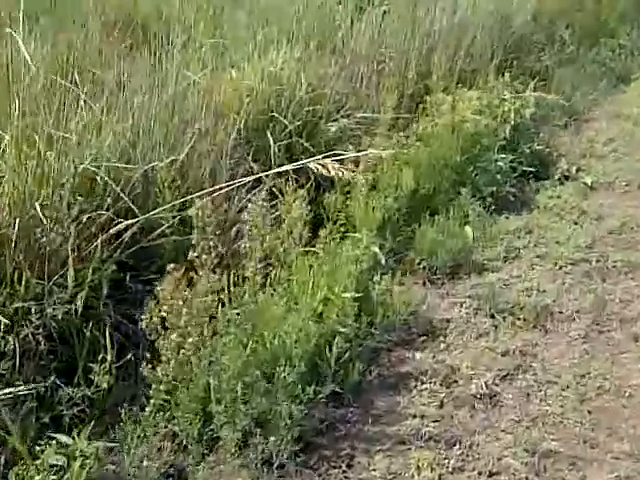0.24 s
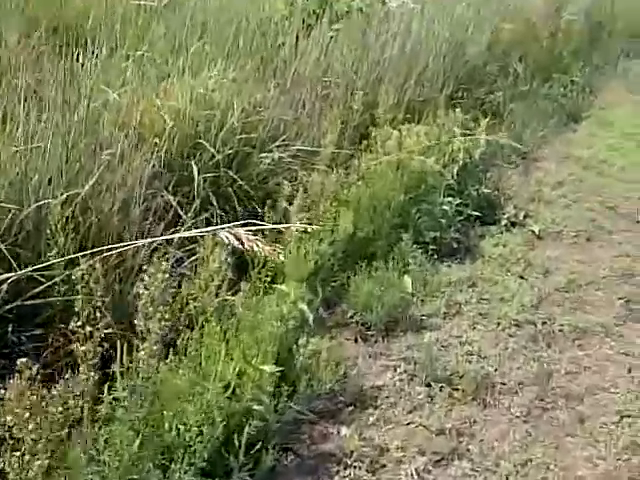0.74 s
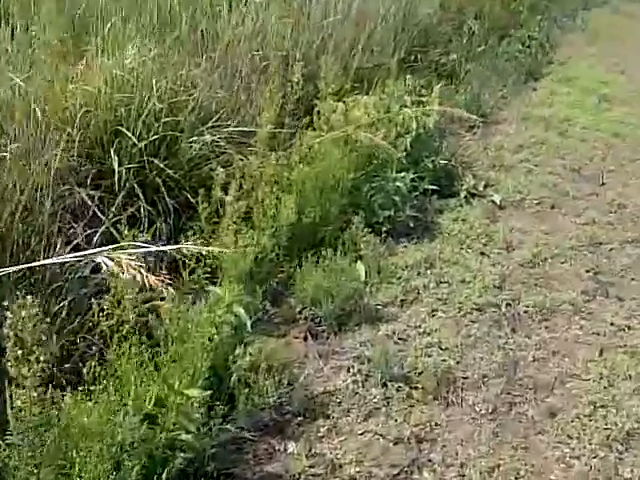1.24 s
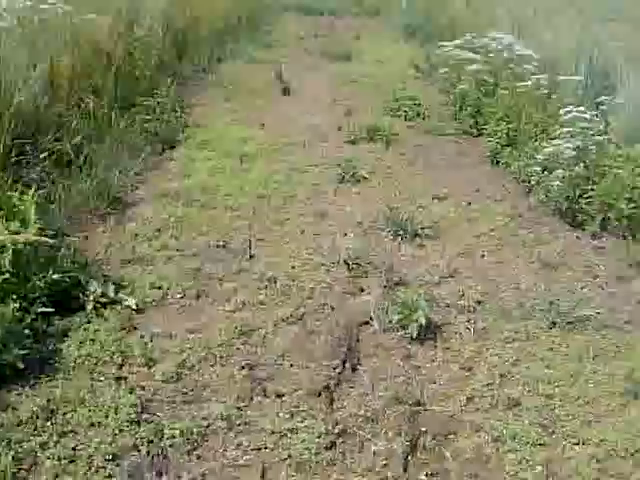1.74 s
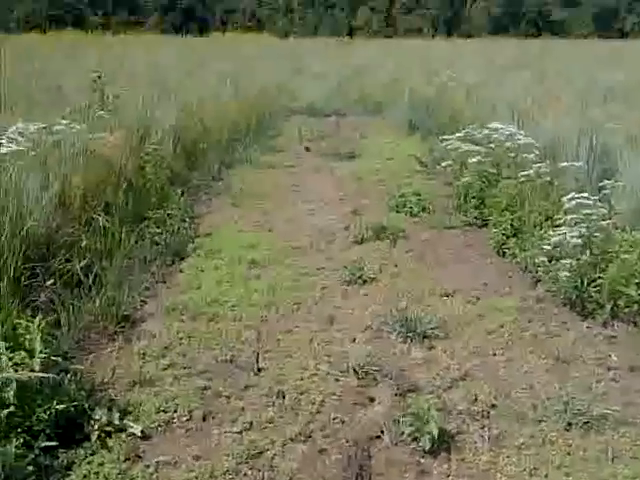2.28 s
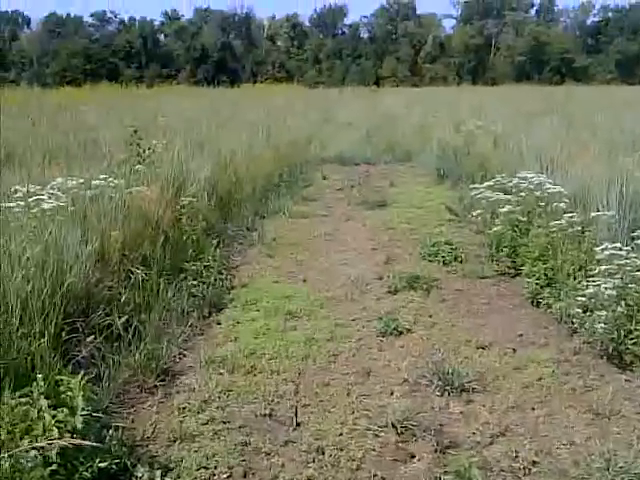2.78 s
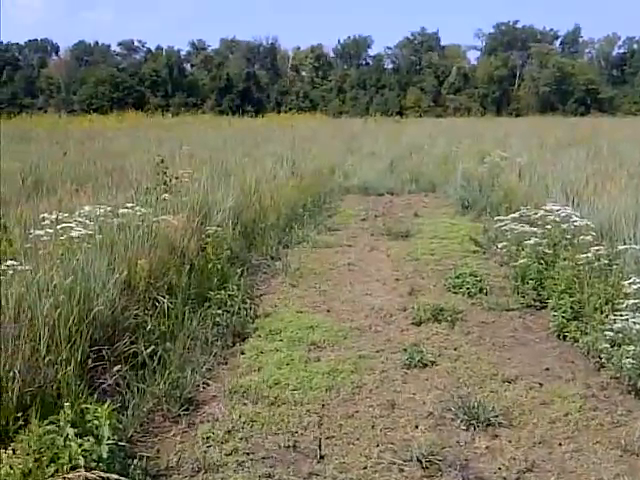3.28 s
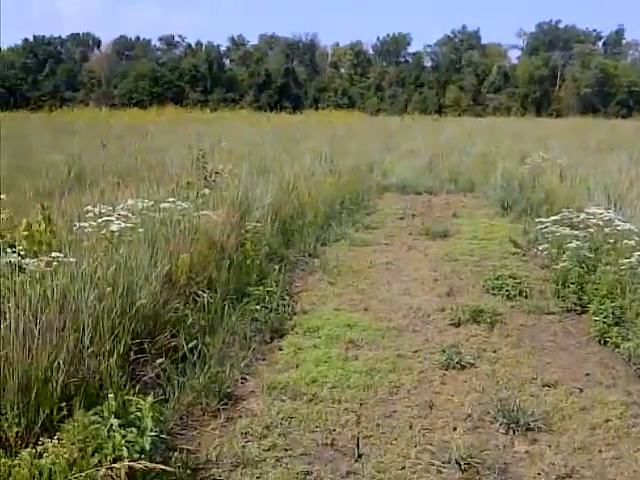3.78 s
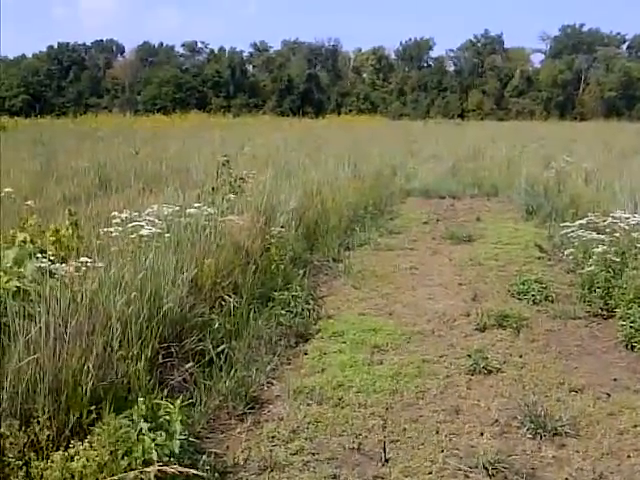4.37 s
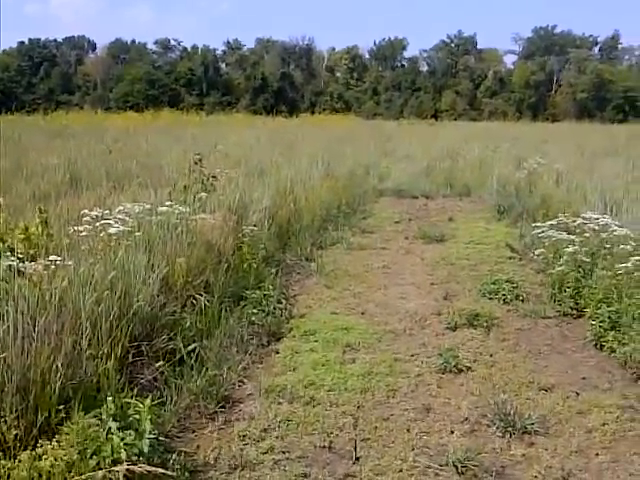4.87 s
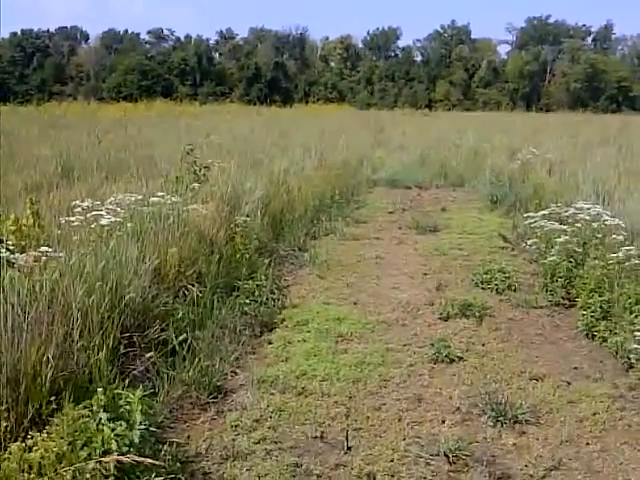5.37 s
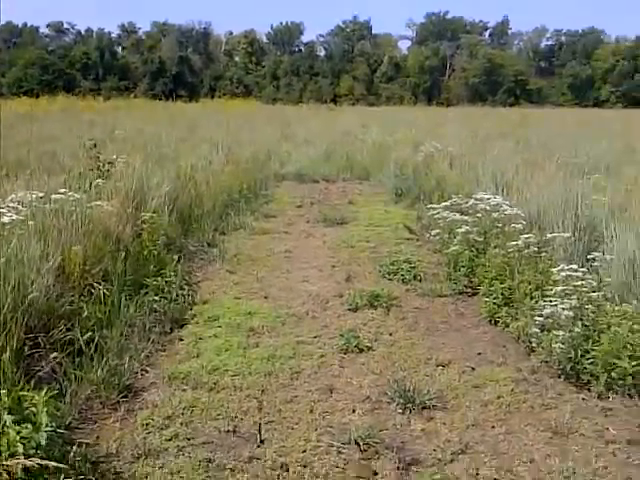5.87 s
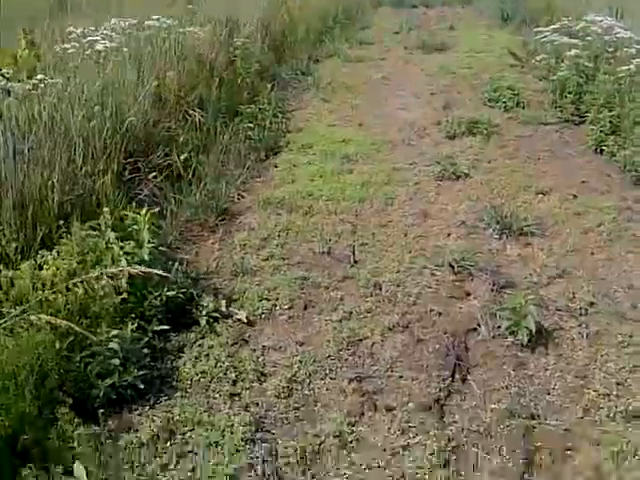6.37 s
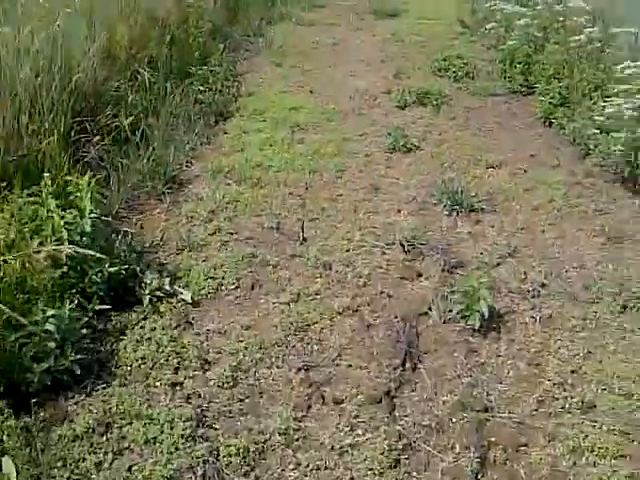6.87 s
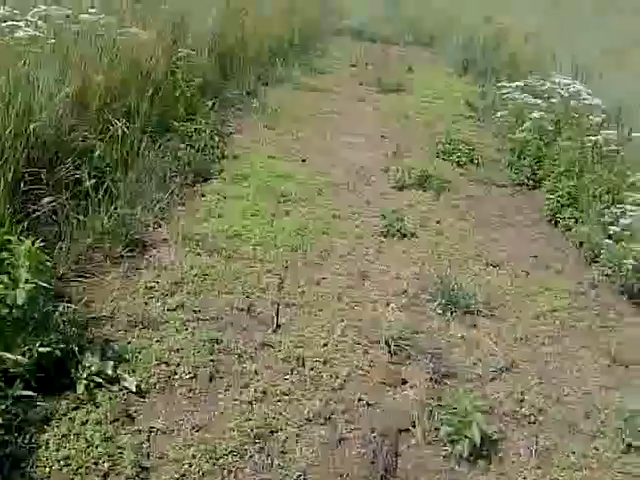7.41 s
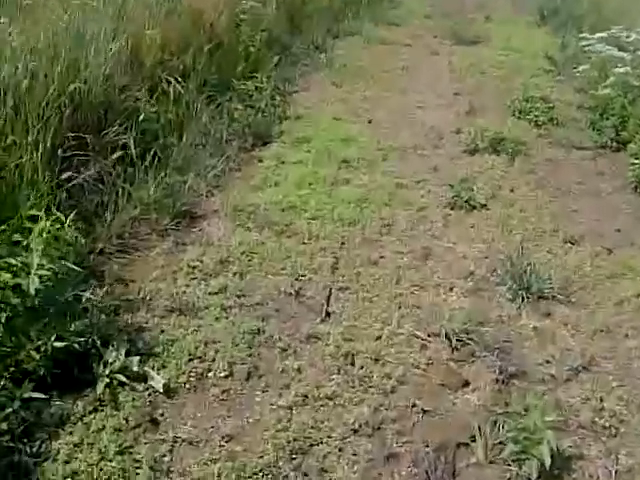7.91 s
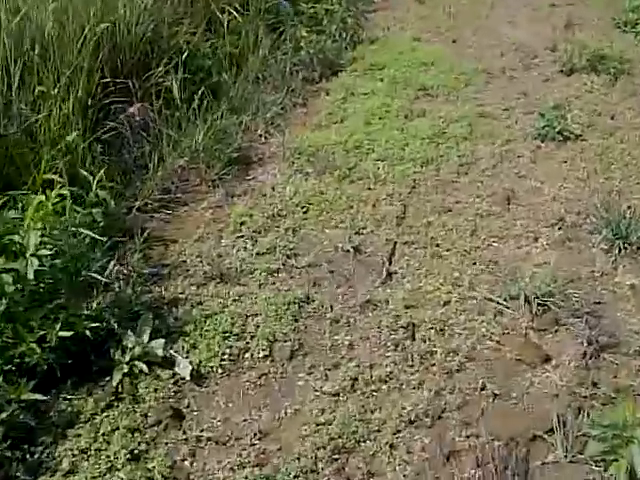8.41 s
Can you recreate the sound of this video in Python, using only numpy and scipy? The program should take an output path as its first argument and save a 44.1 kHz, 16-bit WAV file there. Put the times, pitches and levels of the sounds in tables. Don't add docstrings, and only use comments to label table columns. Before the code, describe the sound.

Outdoors in tall grass, handling thumps and stem snaps precede small far dog yelps, two barks, then louder hoarse bays ending in a howl.

```python
import sys
import numpy as np
from scipy import signal
from scipy.fft import rfft, irfft
from scipy.io import wavfile
from scipy.ndimage import uniform_filter1d

SR = 44100
rng = np.random.default_rng(int(sys.argv[2]) if len(sys.argv) > 2 else 0)


def invert_db(x):
    u = np.asarray(x, float) / 20
    return 10 ** u


def wav_record(signal):
    frames = np.transpose(np.atleast_2d(signal))
    bounded = np.clip(frames, -1, 1)
    quanta = np.round(bounded * 32767).astype(np.int16)
    wavfile.write(sys.argv[1], SR, quanta)


N = 381465
T = np.arange(N) / SR

# (time [s], length [s], start pitch [Hz], top pitch [Hz], level [dB])
YELPS = [
    (2.83, 0.039, 640, 786, -56.5),
    (3.305, 0.028, 743.5, 898.2, -38),
    (3.753, 0.017, 668.5, 686, -60.5),
    (3.917, 0.037, 501.6, 605.6, -53),
    (4.012, 0.033, 1133, 1305, -65),
    (6.989, 0.036, 676, 839, -52.5),
]
# (time [s], length [s], start pitch [Hz], top pitch [Hz], level [dB])
OPENINGS = [
    (5.073, 0.027, 900.2, 1050, -23.5),
    (5.557, 0.024, 967.3, 902, -23.5),
]
# (time [s], fold pitch [Hz], effort [dB], odd over even partials [dB], mouth opening [dB])
FAR_YELP = [(3.04, 760, -69, 30, -5), (3.076, 1260, -53.5, 30, -3), (3.098, 1273, -39.5, 30, -7),
            (3.116, 1243, -45, 30, -5), (3.13, 1250, -90, 30, -2)]
WHIMPER = [(4.063, 660, -65, 24, -8), (4.085, 1015, -53.5, 18, -6), (4.099, 1045, -43.5, 15, 1),
           (4.116, 1065, -73, 24, -3)]
YIP = [(4.427, 920, -63, 33, -26), (4.434, 930, -33, 16, -50), (4.45, 968, -30.5, 13, -47),
       (4.472, 1216, -70, 34, -34)]
WHINE = [(4.658, 672, -72, -42, -14), (4.666, 699, -28.5, -54, -30.5), (4.696, 767, -35.5, -38, -2.5),
         (4.766, 706, -24.5, -59.5, -19.5), (4.793, 683.2, -26, -35, -12.5), (4.853, 644, -35, -38.5, -5.5),
         (4.894, 742, -31, -42, -30.5), (4.906, 697, -41.5, -20, -30), (4.928, 391, -82.5, -15, -28)]
BARK = [(5.104, 690, -26.5, -41.5, -13), (5.122, 733, -18.5, -43, -20.5), (5.164, 723, -18, -36.5, -27.5),
        (5.196, 676, -23, -45.5, -9), (5.208, 710, -25.5, -46, -11.5), (5.218, 703, -29, -46, -13),
        (5.228, 598, -66, -18.5, -19)]
BROKEN_BARK = [(5.583, 633, -30.5, -1.5, -46), (5.593, 725, -23.5, -28.5, -21),
               (5.611, 745, -23.5, -64, -19), (5.666, 709, -20, 0, -27.5), (5.694, 630, -32.5, -10, -13.5),
               (5.716, 640, -37.5, -49, -25), (5.741, 678, -71, -6.5, -7)]
BAY_START = [(7.135, 756.6, -55.5, 18, -5), (7.146, 766.6, -38.5, 15.5, -19), (7.16, 804.3, -32, 6.7, -8.5),
             (7.166, 865.6, -29.5, 5.4, -14)]
BAY = [(7.172, 641.3, -27.5, -0.5, -20), (7.19, 694.8, -31, -11, -4.5), (7.22, 695, -26.5, -3.5, -1.5),
       (7.238, 668.7, -21, -12, -12.5), (7.261, 667, -16, -19, -13), (7.279, 649.3, -17, -14, -18),
       (7.301, 647, -19.5, -16, -11), (7.342, 642, -31, -45.5, -12)]
BAY_TAIL = [(7.363, 603.2, -56, -25, 12), (7.388, 601.3, -49, -14, 12.5), (7.409, 687.7, -43.5, -29.5, -22),
            (7.427, 687.8, -80.5, -9, -2)]
SHORT_START = [(7.655, 719.3, -59, 12.5, -23), (7.659, 696.4, -27.5, 9.9, -11.5),
               (7.671, 753, -26.5, 28, 0), (7.685, 830, -15, 24, -14), (7.694, 757, -23, 18, 6.5)]
SHORT_BAY = [(7.698, 671.4, -29, -9.5, 6.5), (7.723, 717.4, -25.5, -15, -8.5),
             (7.735, 724.2, -29.5, 21, -2), (7.75, 710, -21.5, 9, -30.5), (7.763, 700.3, -31.5, -1, 6),
             (7.786, 678.8, -17, 9.5, -9.5), (7.8, 628.8, -22.5, 5.5, -4.5)]
SHORT_TAIL = [(7.829, 656.6, -36.5, -30, -14), (7.85, 636.3, -30.5, -35, -17),
              (7.873, 630.4, -41, -22, -29), (7.888, 600, -74, -10, -24)]
GROWL_START = [(8.153, 665, -52, 23, -5), (8.157, 648.6, -28, 21.6, 0), (8.172, 718.4, -17.5, 42, -2),
               (8.179, 684, -23, 13, 1.5)]
GROWL = [(8.185, 614, -24.5, 8.5, 1), (8.203, 652, -33.5, -13, 7), (8.227, 631, -20.5, 13.5, 4.5),
         (8.244, 641, -27.5, 6, 12), (8.257, 660, -16.5, 25.5, 17), (8.285, 583, -19.5, 8.5, -9),
         (8.31, 578, -18.5, 12, -24.5), (8.322, 566.3, -22, 13, -12.5), (8.337, 583, -17.5, 6.5, -11.5)]
HOWL = [(8.374, 602.8, -16, 2, -23), (8.424, 616.4, -14, 7, -15.5), (8.443, 623, -15, 11.5, -6.5),
        (8.505, 590.5, -20, -5, -31), (8.538, 586.5, -19.5, -4.5, -19.5), (8.567, 610, -16, 6.5, -16),
        (8.593, 562, -25.5, 4.5, -23.5), (8.615, 639, -30.5, -59, -9.5), (8.649, 516, -69, -17.5, -22.5)]
# (start [s], end [s], irregularity [0-1])
HOARSE = [(5.098, 5.106, .08), (5.577, 5.59, .4), (7.146, 7.174, .6), (7.174, 7.21, .2), (7.21, 7.275, .3),
          (7.662, 7.702, .45), (7.702, 7.82, .14), (8.158, 8.186, .55), (8.186, 8.222, .13),
          (8.222, 8.25, .5), (8.25, 8.272, .4), (8.272, 8.326, .6), (8.326, 8.354, .4), (8.354, 8.575, .06),
          (8.575, 8.595, .22)]
LEAK_DB = [-4, 8, 6.5, 7.5, -4.5, 1.5, -10.5, -1.5, -0.5, 8, 4, 6.5, 3, -15.5, -3.5]
# (upper part [dB], sizzle [dB], growl under the voice [dB])
RASP_COLOUR = [(5, 3, -9), (-3, -0.5, -9.5), (-5.5, -2, 13), (0.5, 3.5, 2), (10, 9.5, -2), (7, -3, 2),
               (-1.5, -1, -4), (-1.5, -11, 15), (-7, 0, 1), (2.5, 1.5, -9), (-1, 9.5, -3.5), (-2, -6, -2),
               (-0.5, -3.5, 0.5), (1.5, 0, -2.5), (2, -4, -4)]
RASP_MIDDLE_DB = [2.5, 6.5, 8, -1, 0.5, -9.5, 3, 7, -0.5, 7.5, 2, -2.5, -1, -2, 5]
# (frequency [Hz], level [dB])
THROAT = [(3000, 2.5), (3300, -15), (3700, -39.5), (4300, -22.5), (4800, -33), (5600, -29), (7500, -39)]
# (time [s], lift of fifth partial [dB], of sixth [dB], of those above [dB])
UPPER = [(4.69, 1.5, -1.5, -4), (4.79, 0, -9.5, 6), (4.83, 0, -15, -11.5), (5.12, 3.5, 7, 0),
         (5.2, -2, -6, -2.5), (5.6, 4.5, -8.5, 7), (5.64, 14.5, 3.5, 21), (5.69, 10, -9.5, -10),
         (7.19, 16, -7.5, -9.5), (7.24, 18, -17, -6), (7.28, 6.5, 6, -3), (7.7, -9.5, -2.5, -11),
         (7.8, 9.5, -8, -3), (8.2, -3.5, -5, -6), (8.3, -4, -7, -2), (8.38, 4, 6.5, 6), (8.6, -6, 1, 3.5)]
# (time [s], peak level [dB], relative knock [dB], relative treble [dB])
SNAPS = [(1.5952, -37, -6, -43), (1.6399, -30, -14, -63), (1.6696, -57, 12, -13), (1.7845, -50.5, -3, -17),
         (2.315, -62.5, 15, -16), (5.995, -18.5, -13, -35.5), (6.318, -23, -18.5, -5),
         (6.427, -28.5, -12, -35), (6.559, -28, -14.5, -11), (6.576, -48, 16, -27), (6.71, -59.5, 19, -15),
         (6.7751, -54.5, 15, -9), (6.8478, -46.5, 11.5, -17), (6.875, -53, 10, -10), (6.9, -25, -17.5, 2),
         (6.9202, -25.5, -7, 8.5), (6.9862, -56, 13.5, -11), (7.1223, -48, -24, -8.5),
         (7.259, -44, -18.5, 5.5), (7.3, -42, 17, -14), (7.482, -26.5, -16.5, -33), (8.11, -48, -5, -2),
         (8.137, -58, 9, -9.5), (1.447, -58, 7, -9), (1.548, -50.5, 0.5, -11), (2.298, -61, 6, -13),
         (6.298, -47, -6, -9), (6.39, -55, 3, -8), (8.1553, -43.5, 5, -15)]
# (frequency [Hz], width [Hz], level [dB])
CRACK = [(1590, 680, 43.5), (2760, 99, 34)]
# (time [s], peak level [dB], pitch [Hz], length [cycles])
BUMPS = [(0.454, -38, 99, 1.4), (0.497, -38, 107, 3.4), (0.537, -37.5, 130, 1.1), (0.854, -38, 129, 0.86),
         (0.877, -26, 153, 0.85), (0.926, -36, 120, 0.63), (0.974, -28.5, 109, 0.72),
         (1.002, -41, 140, 0.81), (1.021, -26.5, 113, 2.4), (1.82, -29.5, 108, 2.1),
         (1.903, -32, 116, 0.93), (4.132, -49, 190, 12.3), (4.179, -50.5, 186, 8.4),
         (5.995, -31.5, 185, 2.8), (6.844, -32, 175, 1.4), (7.197, -25.5, 128.4, 0.47),
         (7.2988, -23.5, 248.8, 1.63)]
# (time of peak [s], rise [s], fall [s], level [dB], relative dry part [dB])
RUSTLE = [(1.4, 1.7, 0.43, -70, -28.5), (1.599, 0.055, 0.091, -55.5, -28), (1.7, .05, .12, -59.5, -24.5),
          (1.945, 0.079, 0.064, -56, -14), (2.21, 0.047, 0.039, -58, -37), (6.001, 0.0066, 0.052, -54, -12),
          (6.32, 0.19, 0.011, -62, -6), (6.358, 0.022, 0.73, -71, -35.5), (6.715, 0.013, 0.36, -61.5, 1),
          (6.764, 0.2, 0.015, -66.5, -4), (6.851, 0.0058, 0.11, -52.5, 6.5), (7.021, 0.059, 0.053, -58, -2),
          (7.15, 0.034, 0.2, -57, -3.5), (7.221, 0.12, 0.13, -61.5, 2), (7.4, 0.33, 0.55, -65.5, -32),
          (7.529, 0.19, 0.27, -71.5, -23), (6.62, 0.093, 0.23, -63.5, -22),
          (7.95, 0.98, 0.82, -60.5, -32.5)]
# (frequency [Hz], width [Hz], level [dB])
DRY_LEAVES = [(3550, 3800, 14), (5800, 2300, -15)]
# (time [s], firing rate [Hz])
ENGINE = [(0, 21), (.6, 20.8), (1.08, 23.7), (1.35, 25.8), (1.71, 26.7), (2.28, 26.3), (2.51, 21.7),
          (2.86, 18.7), (3.1, 19.2), (3.45, 17.7), (3.8, 16.4), (4.3, 16.4), (4.94, 18.6), (5.3, 22.3),
          (6.0, 28.2), (6.36, 27.4), (7.23, 26.4), (8.2, 28.3)]
# (level [dB], exhaust resonance [Hz])
EXHAUST = [(-56, 114.5), (-48, 100), (-47, 113), (-46.5, 119.6), (-46.5, 149), (-47.5, 129), (-48.5, 69),
           (-54.5, 99), (-57.5, 104.5), (-64.5, 78), (-81, 80), (-63, 97), (-50, 110), (-49, 120),
           (-47.5, 123), (-48, 118.8), (-50, 132), (-48, 121)]
# (frequency [Hz], density [dB per Hz])
FIELD = [(25, -22.5), (65, 5.5), (100, 4.5), (180, -3), (400, -14.5), (1300, -17.5), (2200, -23.5),
         (3900, -29.5), (4700, -25.5), (5400, -32), (7500, -33.5)]
# (time [s], level [dB])
BREEZE = [(0, -2.5), (.5, 0), (1.5, -1), (2.1, 0.5), (2.6, -1.5), (3.2, 0), (3.75, -2.5), (4.3, -0.5),
          (5.3, 0.5), (6.5, 2), (8.65, 2)]
# (frequency [Hz], level [dB])
TREBLE_FLOOR = [(3000, -88), (4500, -82), (5300, -75), (7500, -67)]
# (start [s], end [s], lost above [Hz])
TREBLE_LOSS = [
    (.84, .895, 2800),
    (.97, 1.03, 2300),
    (1.605, 1.635, 5300),
    (1.735, 1.79, 6000),
    (1.86, 1.92, 4600),
    (1.99, 2.045, 2300),
    (5.96, 5.985, 6200),
    (6.48, 6.53, 4500),
    (6.935, 6.98, 3000),
]


def noise():
    return rng.standard_normal(N)


def level(x, db):
    return x * invert_db(db) / np.sqrt(np.mean(x ** 2))


def band(lo_hz, hi_hz, x, order=2):
    return signal.sosfilt(signal.butter(order, [lo_hz, hi_hz], "bandpass", fs=SR, output="sos"), x)


def ring(x, modes):
    return sum(invert_db(db) * signal.lfilter(*signal.iirpeak(hz, hz / width, SR), x) for hz, width, db in modes)


def walk(rate):
    hold = int(SR / rate)
    steps = np.repeat(rng.standard_normal(N // hold + 1), hold)
    return level(uniform_filter1d(uniform_filter1d(steps, hold), hold)[:N], 0)


def curve(x, table):
    return np.interp(x, *np.transpose(table))


def log_curve(hz, table):
    table_hz, db = np.transpose(table)
    return np.interp(np.log(hz), np.log(table_hz), db)


def hound():
    calls = [yelp(*row) for row in YELPS] + [opening(*row) for row in OPENINGS]
    calls += [FAR_YELP, WHIMPER, YIP, WHINE, BARK, BROKEN_BARK, BAY_START + BAY + BAY_TAIL]
    calls += [SHORT_START + SHORT_BAY + SHORT_TAIL, GROWL_START + GROWL + HOWL]
    hz, effort_db, doubling_db, mouth_db, gate = phrases(calls, fade_s=.004)
    even_db = effort_db - 10 * np.log10(1 + invert_db(2 * doubling_db))
    odd_db = even_db + doubling_db
    third_db = np.minimum(odd_db + 5, (odd_db + even_db) / 2) - 8.5 + 0.57 * mouth_db
    partial_db = [odd_db, even_db, third_db, even_db + mouth_db]
    effort = invert_db(np.max(partial_db, axis=0))
    clear = .025
    irregularity, leak_db = np.transpose(HOARSE)[2], np.array(LEAK_DB)
    hoarse = np.maximum(over_spells(irregularity), clear)
    leak = np.maximum(over_spells(irregularity * invert_db(leak_db)), clear)
    upper_db, sizzle_db, growl_db = (over_spells(c) for c in np.transpose(RASP_COLOUR))

    voice = vocal_folds(hz, partial_db, hoarse)
    air = level(ring(noise(), [(800, 70, 0), (2100, 600, -19)]), 0)
    breath = invert_db(-35) * band(700, 2600, air) + leak * rasp(mouth_db, upper_db, sizzle_db)
    dry = -band(500, 7000, gate * (voice + effort * breath), order=4)
    growl = invert_db(-30.5 + growl_db) * level(band(280, 610, noise(), order=3), 0)
    dry = dry + gate * effort * leak * growl
    t = np.arange(SR // 8) / SR
    tail = rng.standard_normal(len(t)) * np.exp(-t / 0.03)
    return dry + signal.fftconvolve(dry, tail / np.linalg.norm(tail))[:N] * invert_db(-36)


def vocal_folds(hz, partial_db, hoarse):
    fifth_db, sixth_db, above_db = (np.interp(T, np.transpose(UPPER)[0], c) for c in np.transpose(UPPER)[1:])
    jump = np.clip(np.abs(np.gradient(hz)) * SR / 9000 - 1, 0, 1) * (np.abs(T - 5.35) < .3)
    jump_db = uniform_filter1d(-30 * jump, 130)
    throb = np.exp(-((T - 7.245) / .04) ** 2) * np.cos(2 * np.pi * 80 * (T - 7.264))
    phase = 2 * np.pi * np.cumsum(hz) / SR + .2 * walk(50)
    jitter = hoarse * .7 * walk(140)
    low, overtones = 0, 0
    for k in range(1, 13):
        kin = k if k < 5 else 4 - k % 2
        flutter_db = 1.6 if k < 5 else 5 if k < 7 else 10
        db = partial_db[kin - 1] + log_curve(np.maximum(k * hz, 3000), THROAT) - log_curve(3000, THROAT)
        db = db + flutter_db * np.minimum(walk(60), .5)
        if k > 2:
            db = db + jump_db
        if k == 5:
            db = db + fifth_db
        elif k == 6:
            db = db + 1 + sixth_db
        elif k > 6:
            db = db - 11.5 + above_db
        size = np.sqrt(2) * invert_db(db) * (1 + (.22 if k == 2 else .6) * throb)
        shimmer = 1 + hoarse * .55 * np.tanh(walk(160))
        wobble = min(k, 4) * jitter / (2 if k == 5 else 1)
        partial = size * shimmer * np.sin(k * phase + wobble + .7 * k * k)
        if k > 4:
            overtones = overtones + partial
        else:
            low = low + partial
    low = low * (1 + hoarse ** 2 * 1.4 * np.tanh(walk(40)) * np.cos(phase / 2))
    return band(120, 3320, low, order=8) + overtones


def rasp(mouth_db, upper_db, sizzle_db):
    def resonance(hz, width, db):
        mode = [(hz, width, 0)]
        return level(ring(ring(noise(), mode), mode), db)

    middle = invert_db(over_spells(RASP_MIDDLE_DB)) * resonance(1790, 240, -15.5)
    upper = invert_db(0.083 * mouth_db + upper_db) * (middle + resonance(2770, 320, -14))
    throaty = (resonance(880, 700, -9.5) + upper) * invert_db(1.5 * walk(120))
    sizzle = invert_db(-42.5 + sizzle_db) * level(band(4650, 5600, noise(), order=3), 0)
    spray = invert_db(-41.5) * level(band(3200, 4600, noise()), 0)
    return band(600, 3150, throaty, order=8) + sizzle + spray


def yelp(s, length, start_hz, top_hz, db):
    start_db = -43.5 * np.log2(top_hz / start_hz)
    # (share of length, pitch Hz, relative dB)
    course = [(0, start_hz, start_db), (.5, top_hz * .97, 2), (.68, top_hz, 0), (1, top_hz * 1.02, -19)]
    return [(s + share * length, hz, db + rel_db, 32, -5) for share, hz, rel_db in course]


def opening(s, length, start_hz, top_hz, db):
    bend_hz = .75 * start_hz + 0.21 * top_hz
    # (time after start s, pitch Hz, relative dB)
    course = [(0, start_hz, -31.5), (0.0039, start_hz, -5), (0.49 * length, bend_hz, -2.5), (length, top_hz, 0)]
    return [(s + after_s, hz / 2, db + rel_db, -40, -25.5) for after_s, hz, rel_db in course]


def phrases(tables, fade_s):
    tables = sorted(tables, key=lambda p: p[0][0])
    s, hz, *levels_db = np.concatenate(tables).T
    gate = sum((T >= p[0][0] - .002) & (T <= p[-1][0] + .008) for p in tables) > 0
    arcs = [40 * np.log10(np.interp(T, s, invert_db(c / 2))) for c in levels_db]
    return [uniform_filter1d(c, int(fade_s * SR)) for c in [np.interp(T, s, hz), *arcs, 1. * gate]]


def over_spells(values):
    steps = sum(float(v) * ((T > start) & (T < end)) for (start, end, _), v in zip(HOARSE, values))
    return uniform_filter1d(steps, int(.016 * SR))


def snaps():
    out, t = np.zeros(N + SR), np.arange(SR // 20) / SR
    knock = np.sin(2 * np.pi * 650 * t) * np.exp(-t / 0.00082)
    for s, db, knock_db, treble_db in SNAPS:
        ticks = rng.standard_normal(len(t)) * (np.exp(-t / .0007) + .025 * np.exp(-t / .012))
        crack, treble = ring(ticks, CRACK), band(1900, 4500, ticks)
        snap = crack / np.abs(crack).max() + invert_db(treble_db) * treble / np.abs(treble).max()
        out[int(s * SR):][:len(t)] += invert_db(db) * (snap + 3.15 * invert_db(knock_db) * knock)
    return band(130, 5840, out[:N])


def bumps():
    out, t = np.zeros(N + SR), np.arange(SR // 10) / SR
    for s, db, hz, cycles in BUMPS:
        swing = t * hz / cycles
        envelope = 5 * np.e * swing * np.exp(-5 * swing)
        out[int(s * SR):][:len(t)] += invert_db(db) * envelope * np.sin(2 * np.pi * hz * t)
    rub = sum(invert_db(db - 18) * np.exp(-np.abs(T - s) / 0.03) for s, db, _, _ in BUMPS)
    return out[:N] + rub * invert_db(4.3 * walk(60)) * level(band(45, 234, noise(), order=3), 0)


def rustle():
    low, high = 0, 0
    for s, rise, fall, db, dry_db in RUSTLE:
        stroke = invert_db(db - 20 * np.where(T < s, (s - T) / rise, (T - s) / fall))
        low = low + stroke
        high = high + stroke ** 2 / stroke.max() * invert_db(dry_db)
    grains = rng.standard_normal((3, N)) * invert_db(2.2 * walk(400))
    early = level(ring(grains[0], [(1420, 210, 20), (710, 250, 1.5), (2040, 600, -9.5)]), 0)
    late = level(ring(grains[1], [(2000, 350, 0), (1450, 300, -4), (820, 300, -5)]), 0)
    dry_scrape = level(band(2500, 7200, ring(grains[2], DRY_LEAVES)), 0)
    return low * np.where(T < 4, early, late) + high * dry_scrape


def engine():
    rate_hz = curve(T, ENGINE)
    s = np.transpose(ENGINE)[0]
    db, pipe_hz = (np.interp(T, s, c) for c in np.transpose(EXHAUST))
    lumpy = np.clip((24 - rate_hz) / 7, .1, 1)
    phase = 2 * np.pi * (np.cumsum(rate_hz) / SR + 0.047 * lumpy * walk(22) + .1)
    pipe_width, upper_hz, upper_width, upper_db = 66.8, 239, 15, -12
    out = 0
    for k in range(2, 12):
        hz = k * rate_hz
        main_pipe = 1 / (1 + 2j * (hz - pipe_hz) / pipe_width) ** 3
        upper_pipe = invert_db(upper_db) / (1 + (2 * (hz - upper_hz) / upper_width) ** 2)
        pipe = main_pipe + invert_db(-15) + upper_pipe
        order = (pipe * invert_db(1.6 * walk(4)) * np.exp(1j * k * phase)).real
        out = out + order / (1 + (hz / 250) ** 16)
    out = out / np.sqrt(uniform_filter1d(out ** 2, SR // 3))
    return out * invert_db(db + 2.6 * lumpy * walk(14))


def field():
    hz = np.maximum(np.fft.rfftfreq(N, 1 / SR), 1)
    hiss = irfft(rfft(noise()) * invert_db(log_curve(hz, FIELD)), N)
    hiss = hiss * invert_db(-62.5) / np.std(band(180, 12000, hiss))
    breeze_db = curve(T, BREEZE)
    wind = level(band(16, 83, noise()), -71.5)
    return hiss * invert_db(.6 * walk(8) + breeze_db) + wind * invert_db(2 * breeze_db)


def drop_faint_treble(x):
    hz, s, z = signal.stft(x, SR, nperseg=512)
    power = np.abs(z) ** 2
    patch = uniform_filter1d(power, size=5, axis=0)
    scatter = rng.standard_normal((len(hz) // 8 + 1, z.shape[1] // 3 + 1))
    scatter_db = 7 * np.repeat(np.repeat(scatter, 8, axis=0), 3, axis=1)[:len(hz), :z.shape[1]]
    floor_db = np.interp(hz, *np.transpose(TREBLE_FLOOR), left=-200)[:, None] + scatter_db
    for start, end, above_hz in TREBLE_LOSS:
        spell = np.ix_(hz > above_hz, (s > start) & (s < end))
        floor_db[spell] = -50 + 2 * scatter_db[spell]
    over = patch / (2 * np.sum(power, axis=0) * invert_db(2 * floor_db) + 1e-20)
    return signal.istft(z * over ** 2 / (1 + over ** 2), SR, nperseg=512)[1][:N]


def scene():
    return (hound() + snaps() + bumps() + rustle() + engine() + field())[None]


def top_cut(x):
    return signal.sosfilt(signal.butter(12, 7630, fs=SR, output="sos"), x)


def record(dry):
    top_hz = 7400
    low_pass = signal.cheby2(14, 42, top_hz * 1.073, fs=SR, output="sos")
    mix = drop_faint_treble(signal.sosfilt(low_pass, dry)[0])[None]
    return top_cut(mix)


dry = scene()
out = record(dry)
wav_record(out)
```